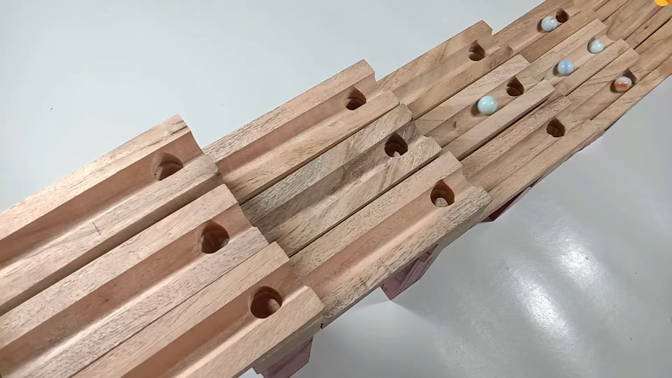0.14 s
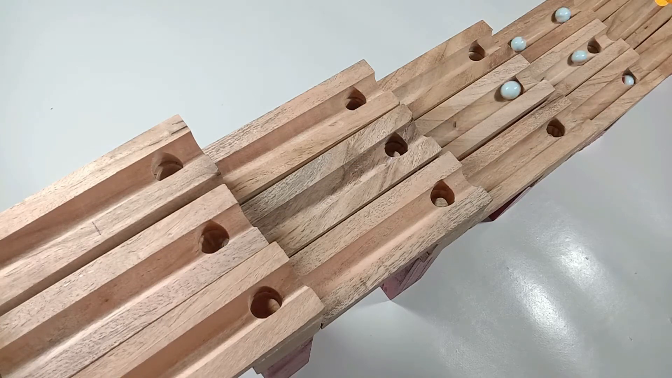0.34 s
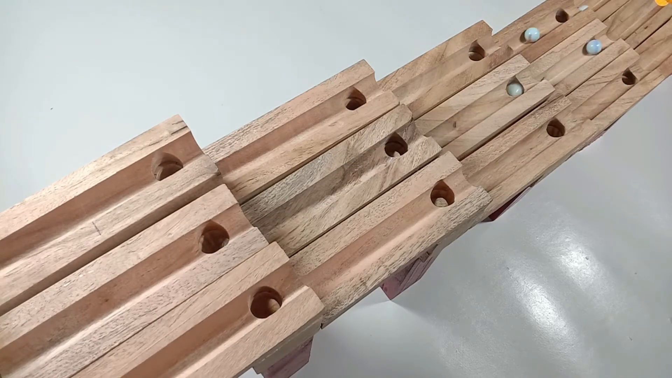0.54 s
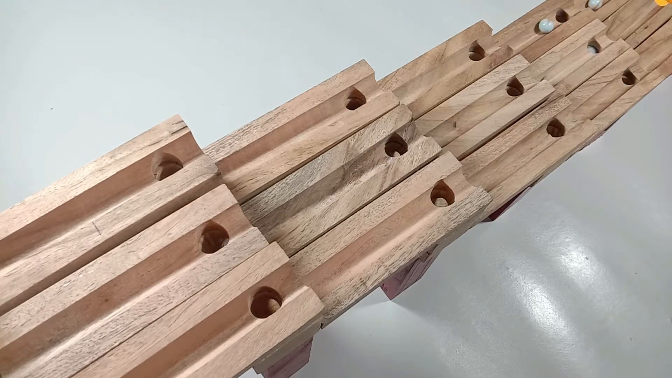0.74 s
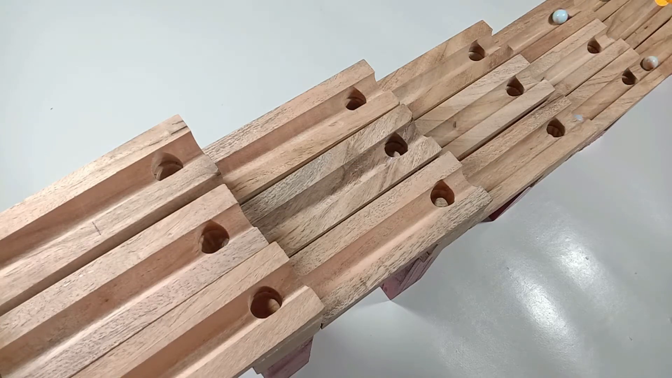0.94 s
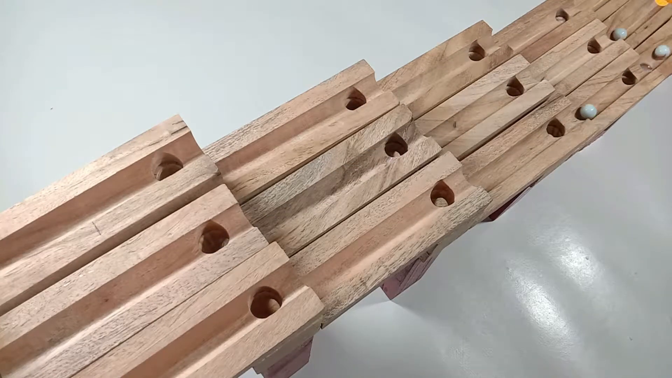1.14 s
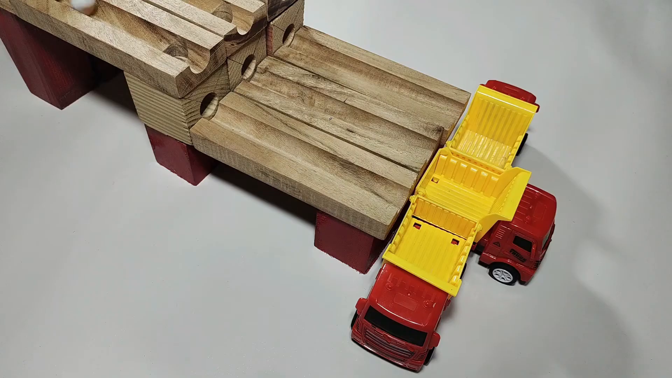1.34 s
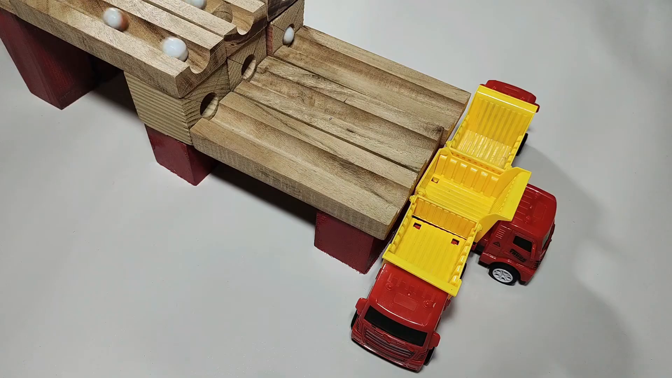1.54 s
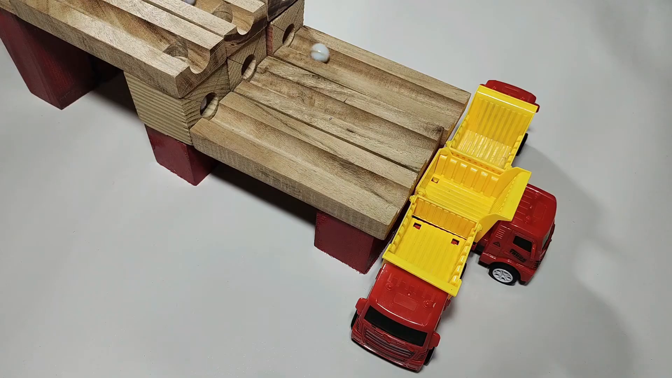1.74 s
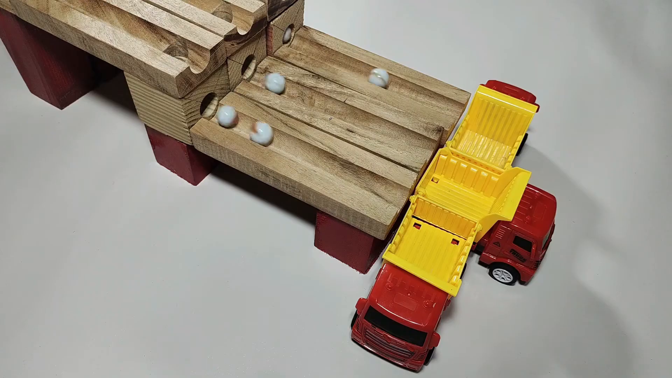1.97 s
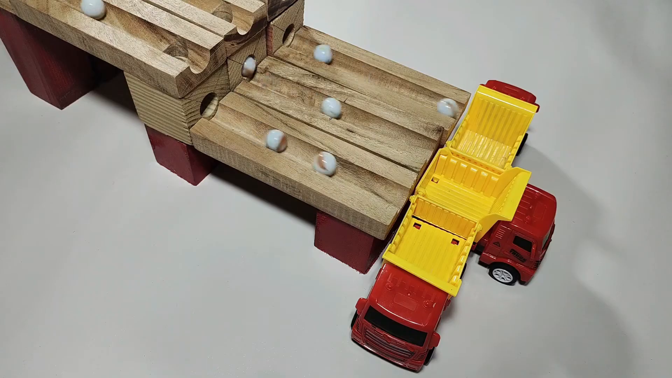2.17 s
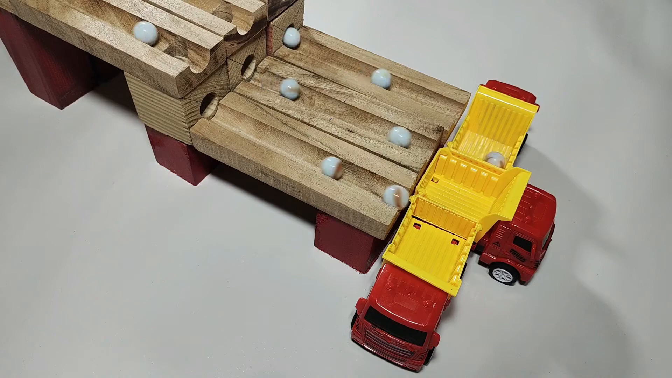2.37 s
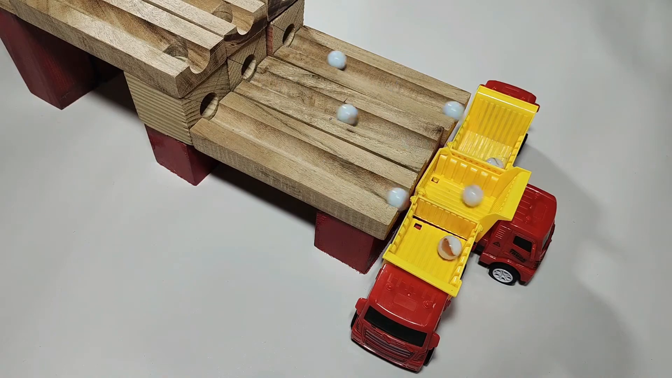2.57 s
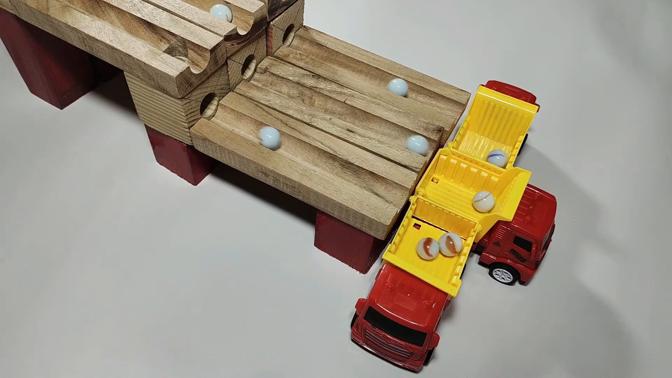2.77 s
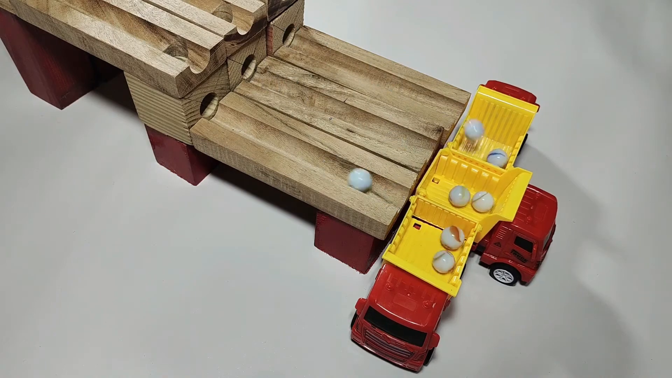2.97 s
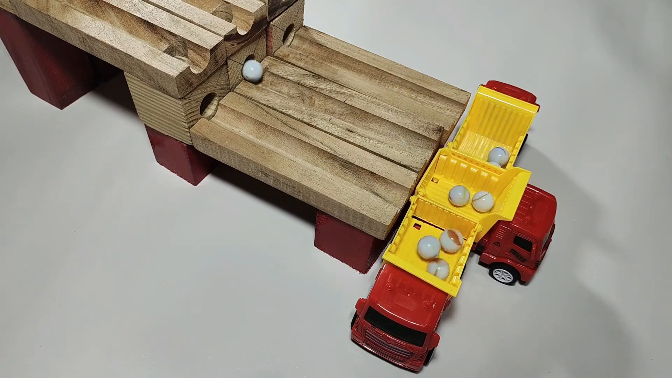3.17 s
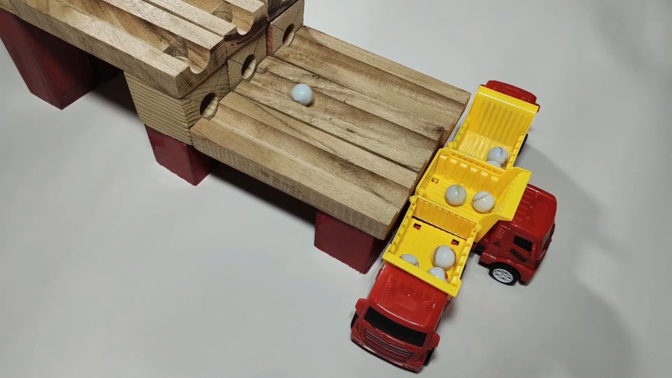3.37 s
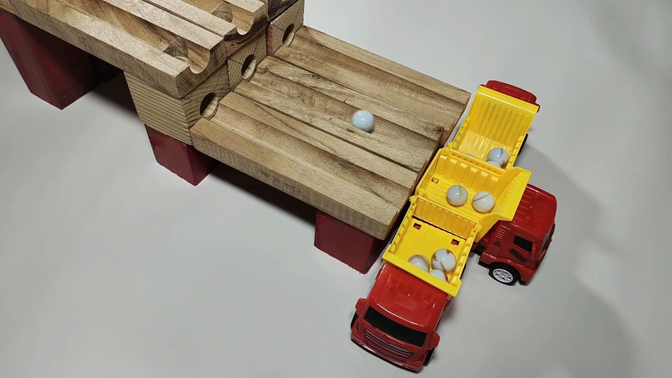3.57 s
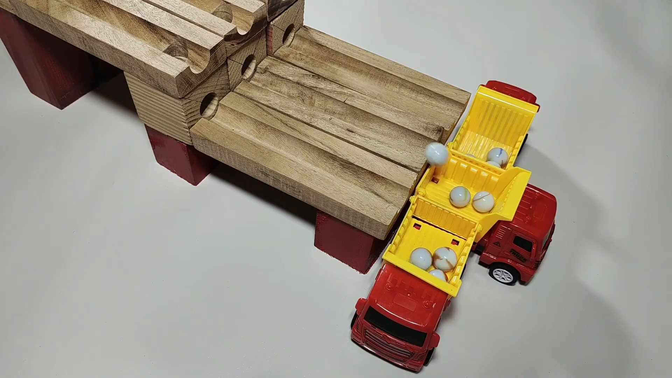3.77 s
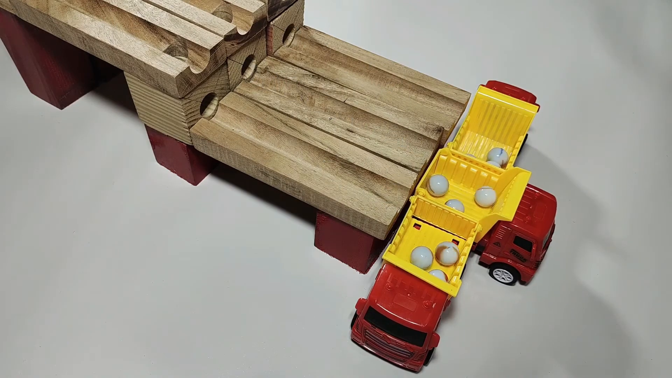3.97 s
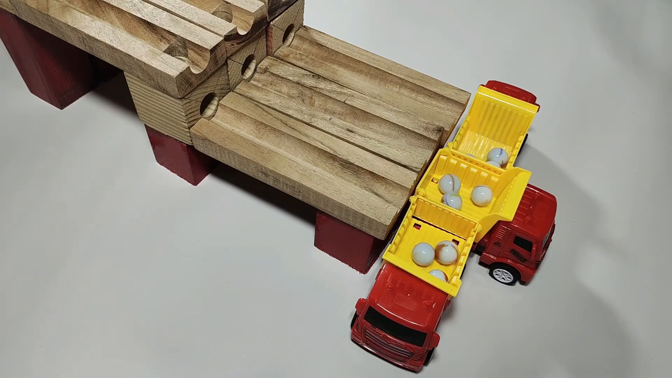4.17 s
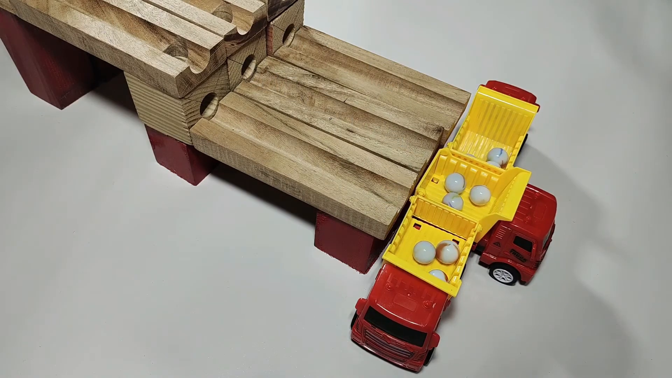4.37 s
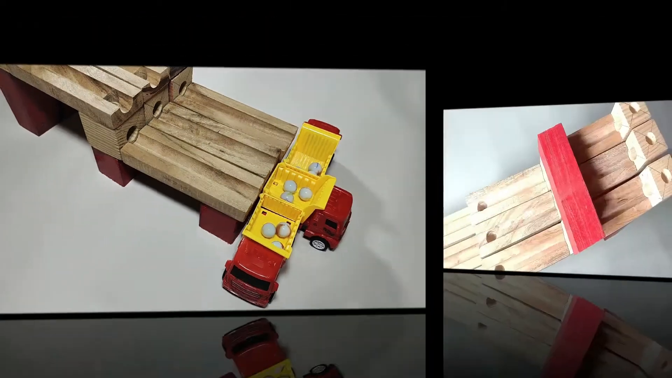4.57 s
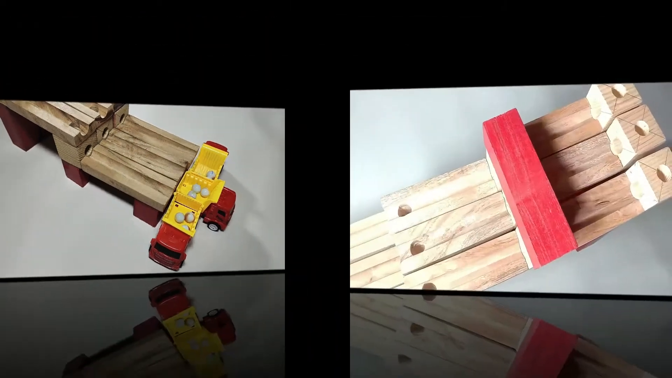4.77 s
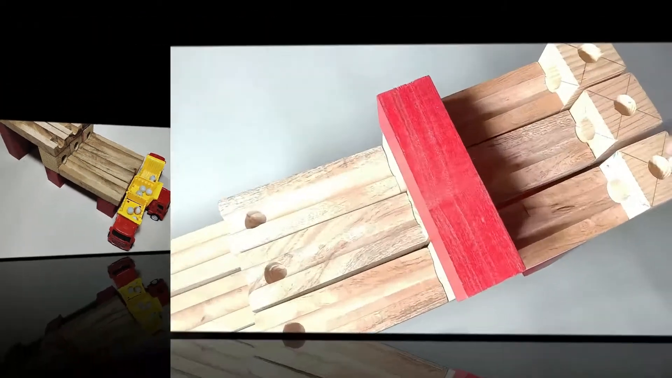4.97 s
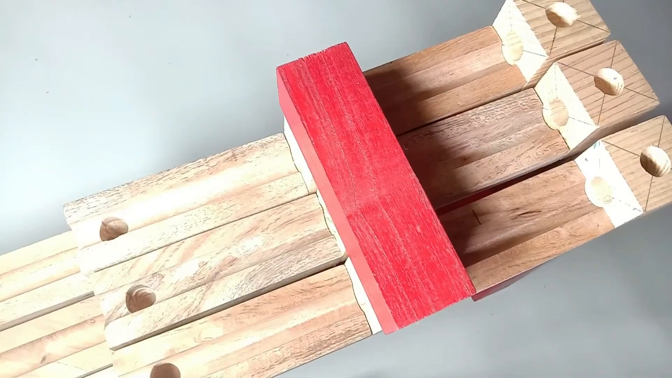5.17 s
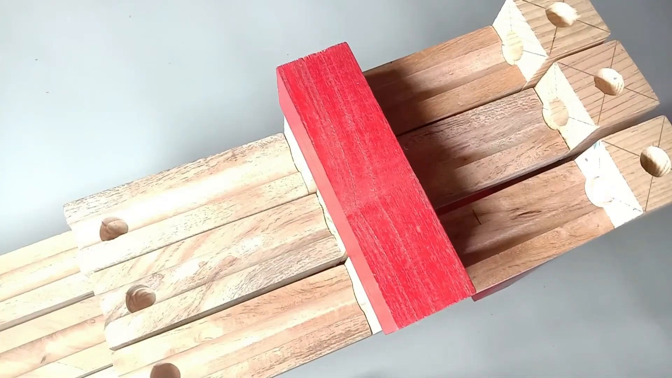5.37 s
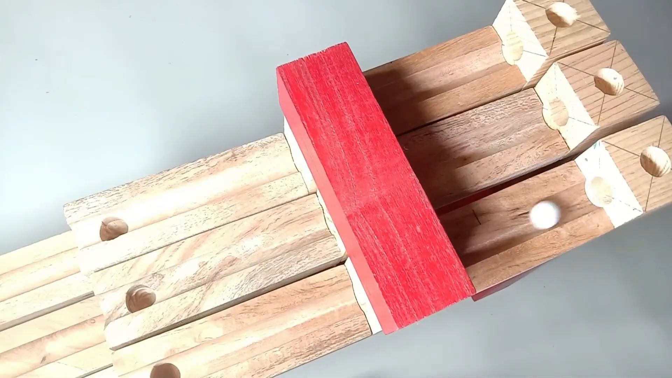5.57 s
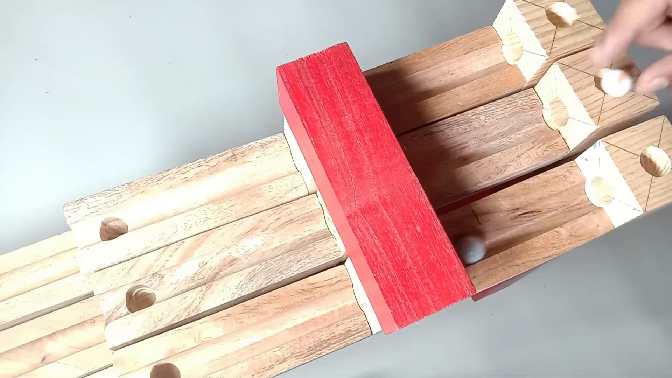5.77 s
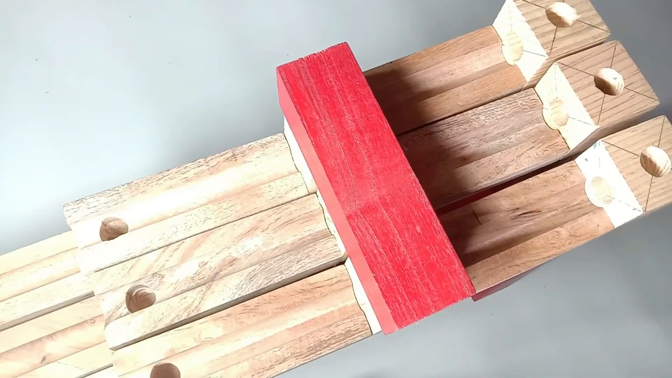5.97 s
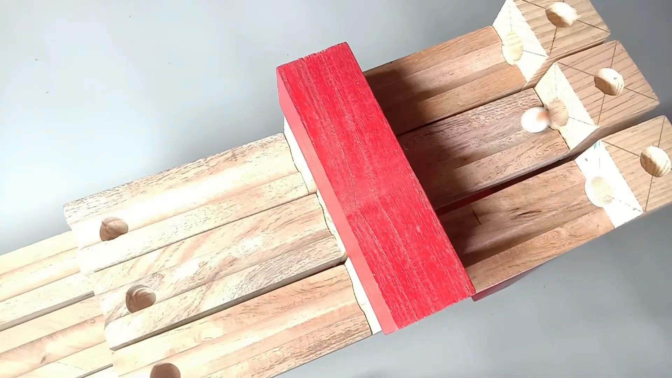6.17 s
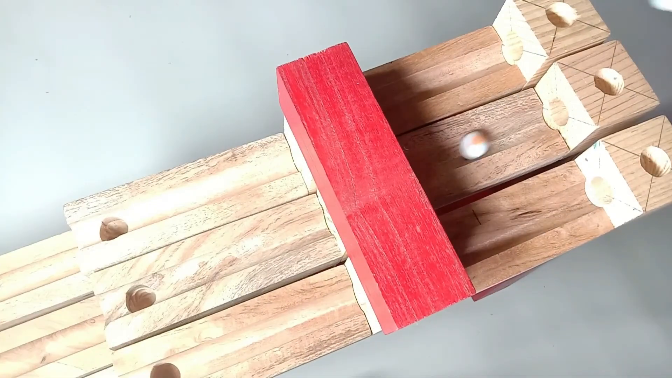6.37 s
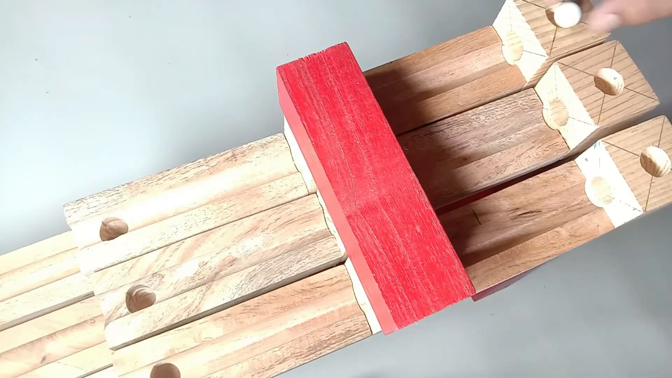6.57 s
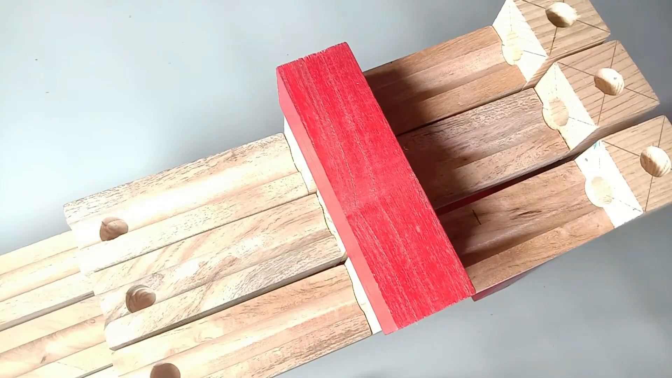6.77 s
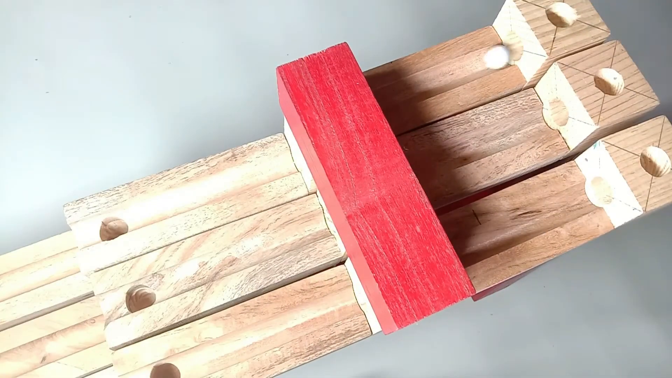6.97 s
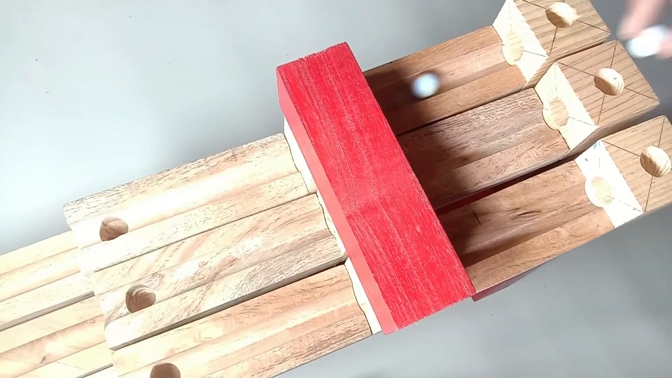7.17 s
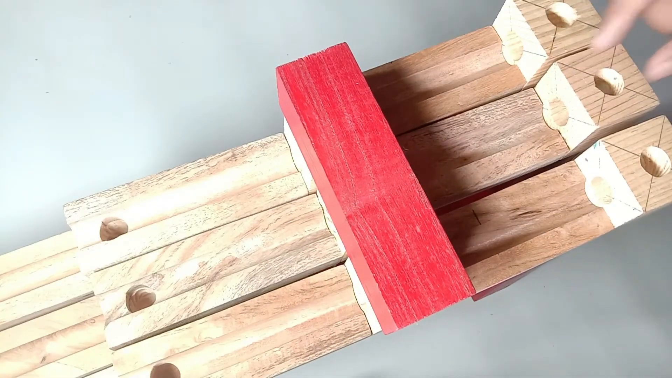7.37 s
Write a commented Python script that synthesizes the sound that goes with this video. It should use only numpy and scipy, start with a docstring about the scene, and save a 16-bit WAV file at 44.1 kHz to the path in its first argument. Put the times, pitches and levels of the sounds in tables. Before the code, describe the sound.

Marbles on wooden tracks, heard nearly mono with a short indoor tail: woody rumbling clatter first, then crisp scattered ticks, then very loud hard plastic hits crowding together. They thin out, a last marble buzzes down its groove and smacks in, and faint rocking dies away. Then sparse wooden knocks with a low hollow hum beneath, short rolls, and delicate high glass clicks in the hand. The room is otherwise hushed.

```python
"""Glass marbles on wooden marble runs, heard in three places one after another: a long ramp at some distance,
the foot of a run whose marbles fall into plastic toy trucks, and a short track fed by hand.
Every knock is a sharp blow, a few ms of rattle and a short tail; rolling is a fine grit of tiny blows.
One marble buzzes down a groove, marbles click in the hand, air hums under the short track; the room is still."""
import sys
import numpy as np
from scipy import signal
from scipy.fft import rfft, irfft
from scipy.io import wavfile
from scipy.ndimage import uniform_filter1d

SR = 44100
rng = np.random.default_rng(int(sys.argv[2]) if len(sys.argv) > 2 else 0)


def materialize(psi):
    """Save the field psi as 16-bit PCM at rate SR to the path in sys.argv[1].

    A 1-D psi becomes a single channel; in a 2-D psi each row is a channel.
    """
    bounded = np.clip(np.atleast_2d(psi).T, -1, 1)
    quanta = np.round(bounded * 32767).astype(np.int16)
    wavfile.write(sys.argv[1], SR, quanta)


N = 327222
TIME_S = np.arange(N) / SR
SCENE_HZ = np.fft.rfftfreq(N, 1 / SR)
KNOCK_SAMPLES = 8192
THUD_HZ, TICK_HZ = 700, 4500  # band splits


def amp(db):
    """Amplitude factor of a level in dB."""
    return 10 ** (np.asarray(db) / 20)


def evened(x):
    """Scales to an RMS of 1 along the last axis."""
    return x / np.sqrt(np.mean(abs(x) ** 2, -1, keepdims=True) + 1e-30)


def read(points, hz):
    """Reads a (Hz, dB) curve, straight over log frequency."""
    f, value = np.transpose(points)
    return np.interp(np.log(hz + 1), np.log(f + 1), value)


def add(mix, start_s, sound):
    """Adds a sound into the mix at its start, cut at the end."""
    part = mix[max(round(start_s * SR), 0):][:len(sound)]
    part += sound[:len(part)]


def smooth_noise(samples):
    """Slowly wandering noise, RMS 1."""
    return evened(uniform_filter1d(rng.standard_normal(N), size=samples))


def coloured(x, colour):
    """Filters x by a (Hz, dB) colour, then evens it."""
    return evened(irfft(rfft(x) * amp(read(colour, SCENE_HZ)), N))


def peak(hz, centre_hz, width_hz):
    """Amplitude response of one resonance."""
    return 1 / np.sqrt(1 + (2 * (hz - centre_hz) / width_hz) ** 2)


def passing(rows, swell_db_per_s=557, die_db_per_s=307.5):
    """Level curve (s, dB): each pass swells in, drifts from its first to its last level and dies away."""
    t = np.arange(0, N / SR + .01, .005)
    start, end, first_db, last_db = np.transpose(rows)[:4, :, None]
    progress = np.clip((t - start) / (end - start), 0, 1)
    db = first_db + (last_db - first_db) * progress
    db = db - swell_db_per_s * np.maximum(start - t, 0) - die_db_per_s * np.maximum(t - end, 0)
    return np.transpose([t, 10 * np.log10((amp(db) ** 2).sum(0) + 1e-20)])


def pass_level(rows, **rates):
    """Amplitude of the passes at every sample."""
    s, db = passing(rows, **rates).T
    return amp(np.interp(TIME_S, s, db, -200, -200))


def rolling(rows, colour, modes, lumpy_db, uneven_db, ring_db):
    """Tiny blows on the grain of the groove, of uneven size and in lumps, faintly ringing the same body."""
    blows_per_s = 350
    grit = amp(uneven_db * np.minimum(rng.exponential(1, N), 3.0)) * (rng.random(N) < blows_per_s / SR)
    grit = evened(grit * rng.choice([-1, 1], N)) + 0.85 * rng.standard_normal(N)
    lumps = uniform_filter1d(uniform_filter1d(rng.standard_normal(N), size=500), size=500)
    grit *= amp(lumpy_db * evened(lumps))
    rings = 1 + amp(ring_db) * sum(peak(SCENE_HZ, f, width) ** 2 for f, width, _ in modes)
    level = uniform_filter1d(pass_level(rows), size=400)
    return level * coloured(irfft(rfft(grit) * rings, N), colour)


def causal(gain):
    """Minimum-phase response with this gain: nothing sounds before the blow."""
    half = KNOCK_SAMPLES // 2
    cepstrum = irfft(np.log(gain + 1e-6))
    cepstrum[..., 1:half] *= 2
    cepstrum[..., half + 1:] = 0
    return np.exp(rfft(cepstrum))


def thirds(hz):
    """Splits the spectrum into bass, middle and treble shares."""
    low = 1 / (1 + (hz / THUD_HZ) ** 6)
    high = 1 / (1 + (TICK_HZ / (hz + 1)) ** 8)
    return np.array([low, (1 - low) * (1 - high), high])


def lawful(rows, law):
    """Adds to each knock the thud and tail that its ring and strength call for."""
    s, db, hz, tick_db = np.transpose(rows)
    thud_db, per_octave, thud_slope, per_tick, tail_db, tail_slope = law
    stronger_db, octaves = db + 20, np.log2(hz / 1500)  # against a blow of -20 dB ringing at 1500 Hz
    thud = thud_db + per_octave * octaves + thud_slope * stronger_db + per_tick * tick_db
    return np.transpose([s, db, hz, thud, tick_db, tail_db + tail_slope * stronger_db])


def blow_spectra(hz, body, ring_hz, ring_db, spot_db):
    """Power spectra of the snap (every mode flicked for a few cycles) and of the longer ringing."""
    colour, modes = body
    ring_width = 0.11  # share of the ring's pitch
    snap_width_hz, snap_modes_db = 550, 6.5
    woken, shifted = np.moveaxis(rng.standard_normal((len(ring_hz), len(modes), 2)), -1, 0)[..., None]
    broad = amp(read(colour, hz)) ** 2
    snap_ring = amp(ring_db + 13.0) * peak(hz, ring_hz, 0.39 * ring_hz) ** 4
    long_ring = amp(ring_db - 6.0) * peak(hz, ring_hz, ring_width * ring_hz) ** 2
    snap, ringing = broad * (1 + snap_ring ** 2), broad * (1 + long_ring ** 2)
    for k, (f, width, mode_db) in enumerate(modes):
        woken_db = mode_db + spot_db * woken[:, k]
        spot = peak(hz, f * (1 + 0.0096 * shifted[:, k]), width)  # no two blocks ring alike
        flick = peak(hz, f * (1 + 0.017 * shifted[:, k]), max(width, snap_width_hz))
        snap = snap + (amp(woken_db + snap_modes_db) * flick ** 3) ** 2
        ringing = ringing + (amp(woken_db) * spot ** 2) ** 2
    return snap, ringing


def knocks(rows, body, t60_s, rattle_db, rattle_s, ring_db, spot_db):
    """Each blow lands on another spot, so it wakes the modes unevenly and has one ring of its own."""
    contact_s = .0007  # the blow builds up
    softness = 0.18  # dB per octave above the ring, per dB of tick
    s, db, ring_hz, thud_db, tick_db, tail_db = np.transpose(rows)[:, :, None]
    hz, t = np.fft.rfftfreq(KNOCK_SAMPLES, 1 / SR), np.arange(KNOCK_SAMPLES) / SR
    powers = blow_spectra(hz, body, ring_hz, ring_db, spot_db)
    octaves = np.log2(np.clip(hz, ring_hz, np.maximum(ring_hz, TICK_HZ)) / ring_hz)
    soft = amp(softness * tick_db * octaves)
    bands = thirds(hz)[:, None]
    shares = np.array([amp(thud_db), amp(-8.5 + 0 * db), amp(tick_db)])
    snap, ringing = (causal((shares * evened(bands * soft * np.sqrt(power))).sum(0)) for power in powers)

    noise = rng.standard_normal((len(rows), 3, KNOCK_SAMPLES))
    skips = amp(2.7 * evened(uniform_filter1d(noise[:, 2], size=70)))  # the marble skips on in tiny hops
    # the marble chatters for some ms; body and room then die away
    rattle = amp(rattle_db + 6.67 * np.abs(noise[:, 1])) * noise[:, 0] * np.exp(-t / rattle_s)
    fading = amp(-60 * t / np.array(t60_s)[:, None, None]) * np.cos(np.pi / 2 * t / t[-1])
    tail = (irfft(bands * rfft(noise[:, 1])) * fading).sum(0)
    tail = amp(tail_db) * tail * (1 - np.exp(-t / 0.0022))
    after = rattle * (t > .0008) + tail * skips + 0.095 * (t == 0)
    snap_peak = abs(irfft(snap)).max(-1, keepdims=True)
    sounds = amp(db) * irfft(snap + ringing * rfft(after)) / snap_peak
    out = np.zeros(N)
    for start_s, sound in zip(s[:, 0], sounds):
        add(out, start_s + contact_s, sound)
    return out


# Still room. Each row: frequency in Hz, relative level in dB.
HUSH_COLOUR = [(30, -30), (100, 0), (180, -14), (900, -24), (2500, -20), (12000, -36)]


def hush():
    """Still room: steady coloured noise."""
    return amp(-87) * coloured(rng.standard_normal(N), HUSH_COLOUR)


# Struck ramp. Broad colour rows: frequency in Hz, relative level in dB;
# then mode rows: frequency in Hz, nominal width in Hz, relative level in dB.
RAMP_BODY = [(30, -52), (170, -15), (320, -11.5), (710, -7.5), (1230, -1), (3300, 8), (4700, -12),
             (7000, -46.5), (10000, -76)], [(5370, 320, -24.5), (8400, 240, -27), (162, 30, -10),
             (5700, 670, -17.5), (725, 25, 1.5), (1210, 270, 1), (2450, 31, -1), (3120, 150, -12),
             (3780, 99, -7)]
# Marbles passing on the ramp. Each row: start in seconds, end in seconds, level at start in dB, at end in dB.
RAMP_PASSES = [(0, 0.4, -42.5, -34), (.5, 3.2, -37.5, -56), (.61, 0.658, -36.5, -25.5)]
# Colour of the ramp's grit. Each row: frequency in Hz, relative level in dB.
RAMP_GRIT_COLOUR = [(30, -48.5), (170, -10), (700, 2.5), (1500, -7.5), (3700, -20), (4400, -49.5),
                    (8000, -86)]


def ramp_rolling():
    """Marbles rolling down the wooden ramp."""
    return rolling(RAMP_PASSES, RAMP_GRIT_COLOUR, RAMP_BODY[1], lumpy_db=1.3, uneven_db=6.6, ring_db=2.8)


# Blows on the ramp. Each row: start in seconds, snap peak in dB, strongest ring in Hz, treble tick share in dB.
RAMP_BLOWS = [(0.036, -14, 1350, -43), (0.111, -32, 1900, -36), (0.118, -16, 1170, -40.5),
              (0.179, -12.5, 1210, -56), (0.21, -14, 3490, -30), (0.356, -20, 3120, -32.5),
              (0.372, -14.5, 725, -48), (0.478, -22, 2010, -36), (0.511, -16.5, 970, -31.5),
              (0.534, -19, 2650, -21), (0.542, -23.5, 5700, -0.5), (0.749, -16.5, 1800, -61.5),
              (0.76, -17, 686, -54.5), (0.787, -28, 3000, -46.5), (0.802, -18, 1090, -49),
              (0.839, -26, 2700, -55), (0.905, -16, 700, -44), (0.971, -28, 720, -58),
              (1.125, -23.5, 3160, -41.5), (1.16, -27, 3030, -51)]
# Tail: time to fall 60 dB, in seconds, of bass, middle, treble.
RAMP_T60_S = (0.46, 0.33, 0.32)
# Thud and tail law: thud share in dB, its change in dB per octave of ring, per dB of strength, per dB of tick,
# tail in dB, its change per dB of strength.
RAMP_THUD_TAIL = (-7.5, -10.5, -2, 0.11, -26.5, 0.3669)


def ramp_knocks():
    """Marbles striking the wooden ramp; the wood rings in its modes."""
    return knocks(lawful(RAMP_BLOWS, RAMP_THUD_TAIL), RAMP_BODY, RAMP_T60_S,
                  rattle_db=-21.5, rattle_s=0.0039, ring_db=3.4, spot_db=7.1)


# Struck foot of the run. Colour rows: frequency in Hz, relative level in dB;
# then mode rows: frequency in Hz, nominal width in Hz, relative level in dB.
FOOT_BODY = [(47, -25.5), (80, -57), (312, 2.5), (398, 0.5), (744, -1), (3460, -3), (4630, -11),
             (7070, -15), (11500, -41), (16500, -64)], [(1090, 110, -7.5), (2000, 200, -3),
             (3590, 620, -0.5), (6960, 300, -23.5)]
# Marbles passing at the foot. Each row: start in seconds, end in seconds, level at start in dB, at end in dB.
FOOT_PASSES = [(1.3, 1.56, -50, -73), (1.6, 2.07, -55.5, -50), (2.15, 2.3, -43.5, -68.5),
               (2.45, 3.08, -48, -46.5), (3.24, 3.62, -48.5, -60.5)]
# Colour of the foot's grit. Each row: frequency in Hz, relative level in dB.
FOOT_GRIT_COLOUR = [(80, -45), (250, -20.5), (750, 9.5), (1500, 0), (3300, -20.5), (6000, -17.5),
                    (10000, -64.5)]


def foot_rolling():
    """Marbles rolling at the foot of the run, in heavy lumps."""
    return rolling(FOOT_PASSES, FOOT_GRIT_COLOUR, FOOT_BODY[1], lumpy_db=9.6, uneven_db=3.7, ring_db=5.7)


# Blows at the foot. Each row: start in seconds, snap peak in dB, strongest ring in Hz, treble tick share in dB.
FOOT_BLOWS = [(1.308, -23.5, 1960, -16.5), (1.329, -22.5, 3850, -14), (1.369, -19.5, 3520, -9),
              (1.416, -23, 1690, -28), (1.448, -35.5, 930, -4), (1.558, -24, 3740, -21),
              (1.602, -19, 2030, -12.5), (1.638, -24.5, 1900, -20), (1.67, -18, 3360, -15),
              (1.688, -13.5, 2000, -12), (1.719, -24, 880, -11.5), (1.736, -33, 1040, -38),
              (1.755, -28, 4030, -11), (1.763, -14.5, 1340, -20), (1.798, -37, 2900, -31),
              (1.816, -27, 3200, -14), (1.836, -27, 4050, -23), (1.848, -17.5, 1590, -2),
              (1.888, -23, 2050, -21.5), (1.899, -28.5, 3340, -31), (1.905, -21.5, 1360, -28),
              (1.951, -15, 3170, -22), (1.959, -26.5, 1570, -38), (1.981, -19.5, 3260, -22),
              (2.002, -29.5, 840, -11), (2.029, -18, 1295, -23.5), (2.067, -31, 1360, -50),
              (2.141, -28, 3470, -15.5), (2.233, -24.5, 1390, -31), (2.241, -21, 2800, -21.5),
              (2.277, -28, 795, -25), (2.295, -12, 3200, -6), (2.317, -49, 1036, -16),
              (2.335, -34, 1100, -23)]
# Tail: time to fall 60 dB, in seconds, of bass, middle, treble.
FOOT_T60_S = (0.33, 0.15, 0.2)
# Thud and tail law: thud share in dB, its change in dB per octave of ring, per dB of strength, per dB of tick,
# tail in dB, its change per dB of strength.
FOOT_THUD_TAIL = (-31.5, 2, 0.8, 0.03, -30.5, -0.23)


def foot_knocks():
    """Marbles striking the wood at the foot of the run."""
    return knocks(lawful(FOOT_BLOWS, FOOT_THUD_TAIL), FOOT_BODY, FOOT_T60_S,
                  rattle_db=-19.5, rattle_s=0.002, ring_db=6.4, spot_db=6.8)


# Struck plastic truck. Colour rows: frequency in Hz, relative level in dB;
# then mode rows: frequency in Hz, nominal width in Hz, relative level in dB.
TRUCK_BODY = [(47, -79.5), (80, -45.5), (249, -7), (622, -19.5), (1330, -4), (2030, -9), (2480, -3),
              (3870, -10.5), (10800, -14), (13800, -19), (16500, -40)], [(1360, 110, -4.5),
              (2249, 260, -6.5), (2850, 300, -10.5), (1854, 109, -4), (5400, 200, -12), (3547, 110, -7),
              (7060, 1500, -7)]
# Falls into trucks. Each row: start in seconds, snap peak in dB, strongest ring in Hz, treble tick share in dB.
TRUCK_BLOWS = [(2.349, -3, 2370, -10), (2.394, -12.5, 1855, -6.5), (2.427, -9, 2227, -12),
               (2.529, -20.5, 3830, -6), (2.546, -3.5, 2550, -17), (2.601, -2.5, 2450, -11),
               (2.652, -12, 2365, -7), (2.672, -13, 1805, -9.5), (2.694, -22, 1320, -24),
               (2.716, -21, 3420, -6), (2.73, -2, 2400, -3), (2.74, -4, 2572, -19.5),
               (2.77, -14.5, 1415, -9.5), (2.806, -22.5, 2345, -6.5), (2.813, -9.5, 2623, -16.5),
               (2.842, -16.5, 2655, -19), (2.864, -30, 3300, -16), (2.933, -17, 1090, -23.5),
               (2.954, -1, 2366, -12), (2.979, -15, 1530, -12), (3.025, -10.5, 2528, -13.5),
               (3.049, -9.5, 2986, -14), (3.068, -1, 2220, -5.5), (3.077, -2.5, 2342, -11.5),
               (3.115, -12, 1448, -8.5), (3.19, -25.5, 3030, -6.5), (3.203, -13.5, 1945, -3),
               (3.212, -4, 2750, -14), (3.249, -24.5, 3370, -25), (3.275, -12.5, 2680, -17.5),
               (3.301, -18.5, 2580, -14.5), (3.315, -25, 1360, -20.5), (3.427, -31, 1240, -22.5),
               (3.462, -36.5, 1360, 6), (3.51, -46, 1350, -40), (3.545, -45.5, 2325, -36),
               (3.565, -54, 3100, -27), (3.639, -33, 1310, -14), (3.7, -51, 3340, -24),
               (3.778, -53, 3200, -34.5), (3.889, 0, 2920, -13), (3.926, -4, 2590, -11),
               (3.955, -18.5, 2640, -22), (4.014, -17.5, 2134, -13.5), (4.297, -24.5, 3430, -9.5)]
# Tail: time to fall 60 dB, in seconds, of bass, middle, treble.
TRUCK_T60_S = (0.17, 0.2, 0.21)
# Thud and tail law: thud share in dB, its change in dB per octave of ring, per dB of strength, per dB of tick,
# tail in dB, its change per dB of strength.
TRUCK_THUD_TAIL = (-38, 0.5, 0.1664, 0, -30.5, -0.11)


def truck_knocks():
    """Marbles falling into plastic trucks, each blow with a strong ring of its own."""
    return knocks(lawful(TRUCK_BLOWS, TRUCK_THUD_TAIL), TRUCK_BODY, TRUCK_T60_S,
                  rattle_db=-26, rattle_s=0.0052, ring_db=11.0, spot_db=9.5)


# Marbles rolling in a truck. Each row: start in seconds, end in seconds, level at start in dB, at end in dB.
TRUCK_PASSES = [(3.4, 3.72, -66, -70), (4.12, 4.3, -87, -64), (4.48, 5, -80.5, -95)]
# Colour of the truck's grit. Each row: frequency in Hz, relative level in dB.
TRUCK_GRIT_COLOUR = [(900, -53), (1300, 5), (1800, -45.5), (2250, 6.5), (2850, -3), (3200, -18),
                     (7000, -16), (10000, -36)]


def truck_rolling():
    """Marbles rolling faintly in the plastic truck."""
    return rolling(TRUCK_PASSES, TRUCK_GRIT_COLOUR, TRUCK_BODY[1], lumpy_db=7.6, uneven_db=1.5, ring_db=-1)


# Last marble in the groove. Each row: start in seconds, end in seconds, level at start in dB, at end in dB.
BUZZ_PASSES = [(3.745, 3.81, -55, -60.5)]
# Colour of the buzz. Each row: frequency in Hz, relative level in dB.
BUZZ_COLOUR = [(150, -16.5), (260, -8.5), (430, -35), (650, -4), (1350, -5), (1550, -30), (1750, -3),
               (1950, -51)]


def buzz():
    """The last marble buzzes down the groove: nearly even bumps under it."""
    bumps_per_s = 175 * (1 + 0.22 * smooth_noise(200))
    turns = np.cumsum(bumps_per_s) / SR
    bumps = np.diff(np.floor(turns), prepend=0) * amp(3.0 * rng.standard_normal(N))
    rough = evened(bumps) + .4 * rng.standard_normal(N)
    return pass_level(BUZZ_PASSES, swell_db_per_s=2514) * coloured(rough, BUZZ_COLOUR)


# Marbles rocking to rest. Each row: start in seconds, snap peak in dB, strongest ring in Hz.
SETTLING_BLOWS = [(4.074, -53.5, 2400), (4.1137, -62, 2420), (4.1786, -57, 2400), (4.2147, -51, 2480),
                  (4.239, -60, 2540), (4.251, -66, 2650), (4.2866, -40, 2200), (4.352, -53, 2400),
                  (4.407, -63.5, 2220), (4.517, -53.5, 2450), (4.581, -65, 2350), (4.594, -68, 2700),
                  (4.626, -63, 2400), (4.777, -69, 2230)]


def settling():
    """Marbles rocking to rest in a truck bed; they wake only the floor of the bed."""
    bed = TRUCK_GRIT_COLOUR, TRUCK_BODY[1][:3]
    rows = [(*row, -45, -40, -36) for row in SETTLING_BLOWS]  # thud, tick, tail dB
    return knocks(rows, bed, TRUCK_T60_S, rattle_db=-30.0, rattle_s=0.0044, ring_db=4.4, spot_db=3.4)


# Struck short track. Colour rows: frequency in Hz, relative level in dB;
# then mode rows: frequency in Hz, nominal width in Hz, relative level in dB.
TRACK_BODY = [(100, -86), (330, 39), (590, -6.5), (1150, -0.5), (1650, -3), (3500, -9.5), (5000, -21),
              (5700, -17), (8000, -45), (10000, -99)], [(350, 86, 2.5), (1280, 100, -15), (3100, 500, -15),
              (2230, 330, 1), (3960, 320, -4)]
# Blows on the track. Each row: start in seconds, snap peak in dB, strongest ring in Hz, treble tick share in dB.
TRACK_BLOWS = [(5.122, -24, 2190, -29), (5.147, -20.5, 2240, -36.5), (5.228, -17, 2060, -29.5),
               (5.503, -24, 1015, -16.5), (5.516, -35, 1050, -18), (5.556, -36, 1030, -31),
               (5.565, -45, 1060, -32), (5.598, -41.5, 1100, -35), (5.618, -36, 2410, -38),
               (5.641, -40, 2380, -45), (5.727, -34.5, 2480, -58), (5.818, -33.5, 1280, -76),
               (5.868, -42.5, 1230, -39), (5.881, -30.5, 1050, -42), (5.889, -32, 2100, -34),
               (5.916, -15.5, 3900, -17.5), (5.947, -17.5, 1280, -53), (5.975, -29, 1280, -58),
               (6.004, -39.5, 1310, -63), (6.226, -15.5, 3470, -13), (6.236, -23, 1320, -26.5),
               (6.64, -21, 1160, -27.5), (6.651, -31.5, 1030, -5.5), (6.671, -27, 1280, -28.5),
               (6.754, -26, 1210, -55.5), (6.796, -30.5, 2260, -32.5), (6.826, -47, 1280, -35),
               (7.046, -11.5, 1280, -6.5), (7.075, -22, 1170, -10.5), (7.095, -31.5, 1100, -10.5),
               (7.399, -13.5, 3670, -5.5)]
# Tail: time to fall 60 dB, in seconds, of bass, middle, treble.
TRACK_T60_S = (0.25, 0.19, 0.17)
# Thud and tail law: thud share in dB, its change in dB per octave of ring, per dB of strength, per dB of tick,
# tail in dB, its change per dB of strength.
TRACK_THUD_TAIL = (-36, 1.5, -0.01, -0.18, -30, -0.05)


def track_knocks():
    """Marbles striking the short wooden track."""
    return knocks(lawful(TRACK_BLOWS, TRACK_THUD_TAIL), TRACK_BODY, TRACK_T60_S,
                  rattle_db=-21.5, rattle_s=0.0037, ring_db=7.1, spot_db=3.3)


# Hum of the air under the track. Each row: start in seconds, end in seconds, level at start in dB, at end in dB,
# pitch at start in Hz, at end in Hz.
HOLLOW_HUMS = [(5.123, 5.202, -49, -55, 352, 350), (5.254, 5.318, -38, -60, 350, 345),
               (5.499, 5.856, -53.5, -62, 400.2, 350), (5.908, 6.089, -48, -64.5, 353.6, 335),
               (6.27, 6.828, -61.5, -68, 461.4, 345.6)]


def hollow(width_hz=78):
    """Air under the track hums as a marble runs over: narrow noise shifted up to a moving resonance."""
    at_s = np.ravel([row[:2] for row in HOLLOW_HUMS])
    pitch_hz = np.ravel([row[4:] for row in HOLLOW_HUMS])
    r = np.exp(-np.pi * width_hz / SR)
    noise = rng.standard_normal((N, 2)) @ [1, 1j]
    slow = signal.lfilter([1], np.convolve([1, -r], [1, -r]), noise)  # smoothed twice
    slow = slow / abs(slow) ** .6  # the hum holds fairly steady
    turns = np.cumsum(np.interp(TIME_S, at_s, pitch_hz)) / SR
    hum = (slow * np.exp(2j * np.pi * turns)).real
    level = pass_level(HOLLOW_HUMS, swell_db_per_s=2514)
    return uniform_filter1d(level, size=400) * evened(hum)


# Struck marble. Colour rows: frequency in Hz, relative level in dB;
# then mode rows: frequency in Hz, nominal width in Hz, relative level in dB.
GLASS_BODY = [(590, -92), (1000, -26), (1250, -21), (1540, -23.5), (6850, -4.5), (8260, -18.5),
              (14800, -27.5), (16500, -27)], [(5600, 220, -6.5), (6300, 187, -29)]
# Clicks in the hand. Each row: start in seconds, snap peak in dB, strongest ring in Hz.
HAND_CLICKS = [(5.408, -51.5, 6640), (5.469, -44.5, 6900), (6.1608, -53.5, 5300), (6.179, -47, 5210),
               (6.195, -34.5, 6660), (6.204, -25, 6800), (6.2454, -22, 8400), (6.3023, -26.5, 8000),
               (6.3832, -41, 7100), (6.4015, -25, 7000), (6.458, -37.5, 7200), (6.5303, -48, 5660),
               (6.9213, -27.5, 6400), (6.973, -34, 5600), (6.993, -25, 6760), (7.0051, -39, 6960),
               (7.019, -31, 5610), (7.0694, -23.5, 5000), (7.116, -43, 6800), (7.1625, -42, 5650),
               (7.22, -50, 5850), (7.2624, -37.5, 6800)]
# Tail: time to fall 60 dB, in seconds, of bass, middle, treble.
GLASS_T60_S = (0.061, 0.3, 0.17)


def glass_clicks():
    """Marbles clicking together in the hand: nearly all treble."""
    rows = [(*row, -60, 3, -32) for row in HAND_CLICKS]  # thud, tick, tail dB
    return knocks(rows, GLASS_BODY, GLASS_T60_S, rattle_db=-18.5, rattle_s=0.0038, ring_db=11.4, spot_db=5.6)


# Marbles passing on the track. Each row: start in seconds, end in seconds, level at start in dB, at end in dB.
TRACK_PASSES = [(5.52, 5.82, -46, -66.5), (6.31, 6.8, -66, -59), (7.22, 7.42, -61, -58.5)]
# Colour of the track's grit. Each row: frequency in Hz, relative level in dB.
TRACK_GRIT_COLOUR = [(600, -39.5), (950, 3), (1250, 3), (1600, -41), (2200, -9), (3400, -48), (3900, -21),
                     (8000, -77)]


def track_rolling():
    """Marbles rolling along the short wooden track."""
    return rolling(TRACK_PASSES, TRACK_GRIT_COLOUR, TRACK_BODY[1], lumpy_db=4.9, uneven_db=1.6, ring_db=2.1)


# Stereo width. Each row: frequency in Hz, side level against mid in dB.
SIDE_LEVEL = [(60, -23.5), (180, -33.5), (1200, -50), (2500, -42), (5000, -45.5), (13000, -54.5)]


def widened(mid):
    """Almost mono: a faint copy with turned phase differs between the ears."""
    side = irfft(1j * rfft(mid) * amp(read(SIDE_LEVEL, SCENE_HZ)), N)
    return np.array([mid + side, mid - side])


def scene():
    """Sums all sources and widens them."""
    mid = hush() + ramp_rolling() + ramp_knocks()
    mid += foot_rolling() + foot_knocks()
    mid += truck_knocks() + truck_rolling() + buzz() + settling()
    mid += track_knocks() + hollow() + glass_clicks() + track_rolling()
    return widened(mid)


def record(dry):
    """The loudest blows meet a soft ceiling; the microphone drops the deep bass; then the band limit."""
    ceiling, bass_hz, edge_hz = .9, 55, 16600
    held = dry / (1 + (dry / ceiling) ** 6) ** (1 / 6)
    held = signal.sosfilt(signal.butter(2, bass_hz, "high", fs=SR, output="sos"), held)
    return signal.oaconvolve(held, signal.firwin(511, edge_hz, window=("kaiser", 9), fs=SR)[None], "same")


dry = scene()
out = record(dry)
materialize(out)
```